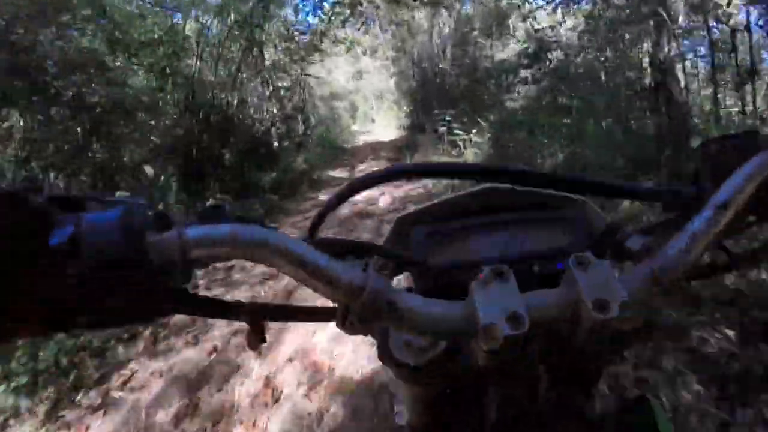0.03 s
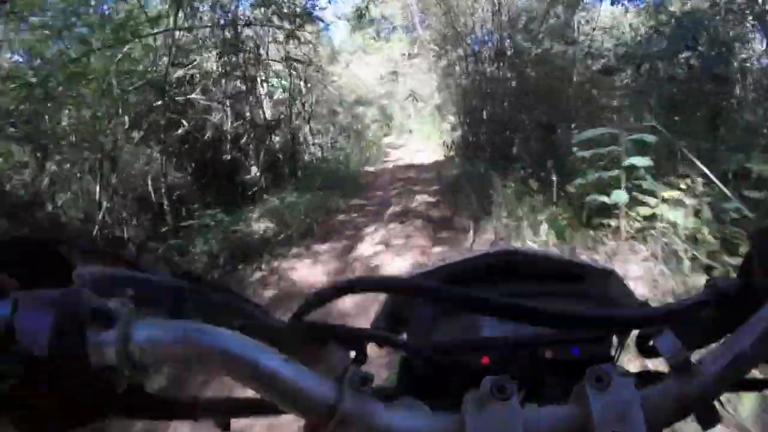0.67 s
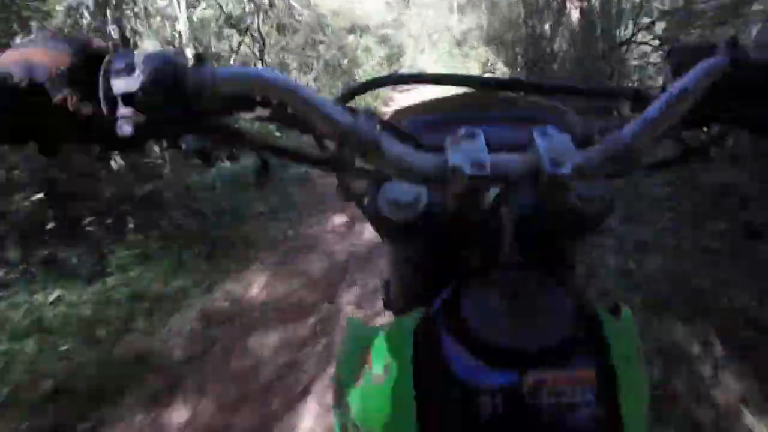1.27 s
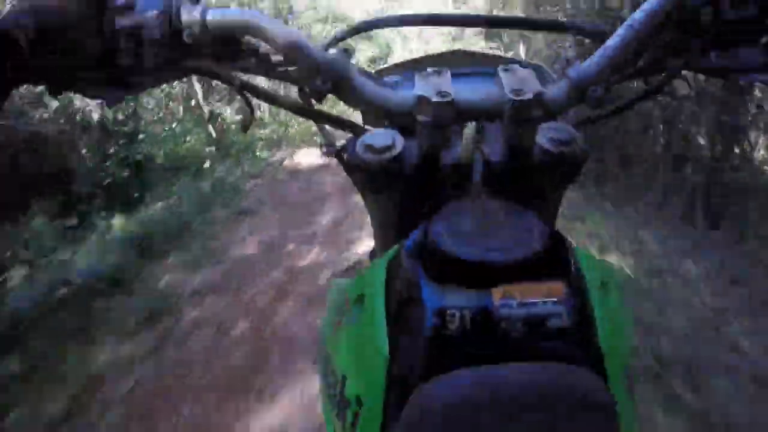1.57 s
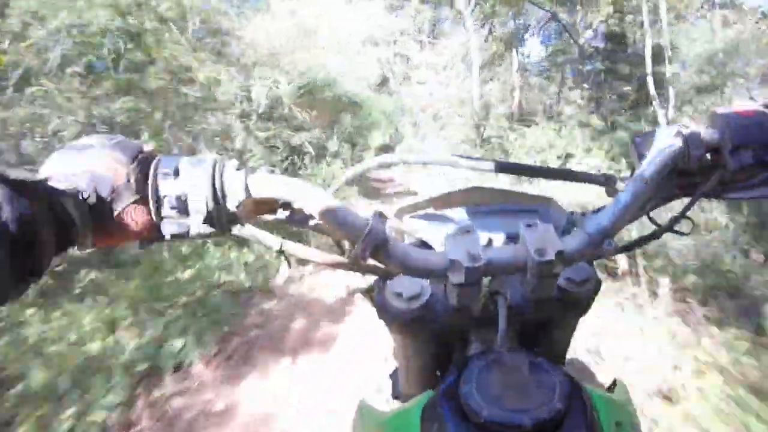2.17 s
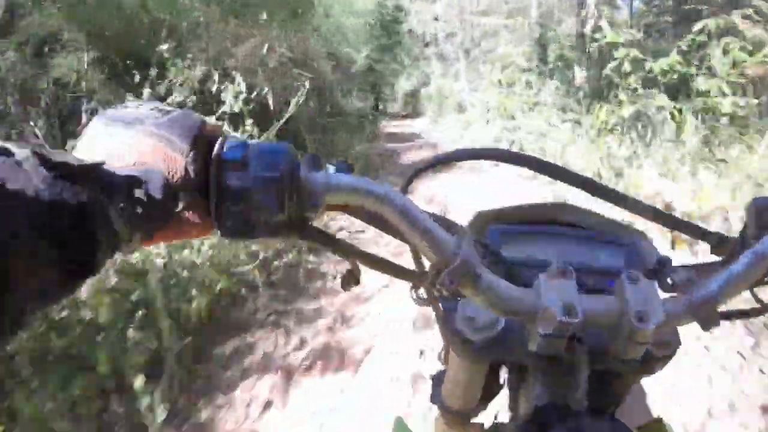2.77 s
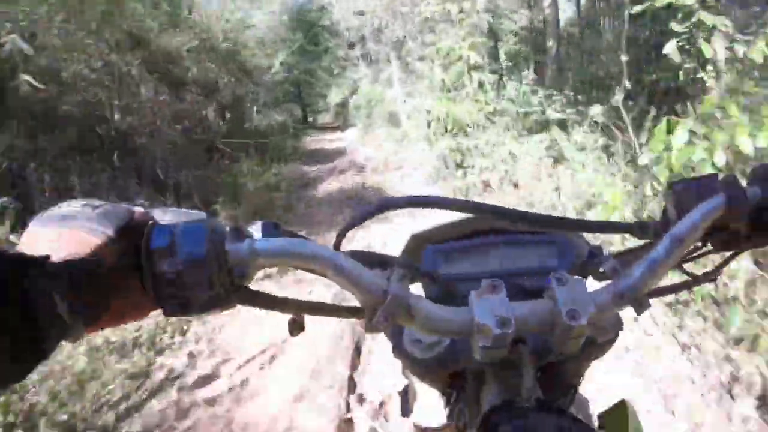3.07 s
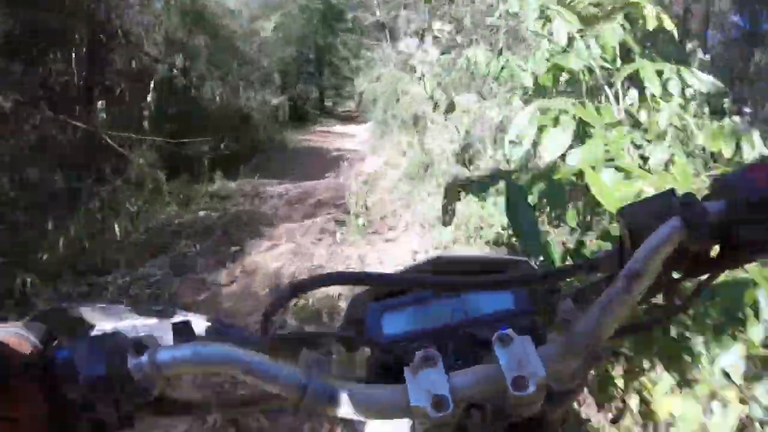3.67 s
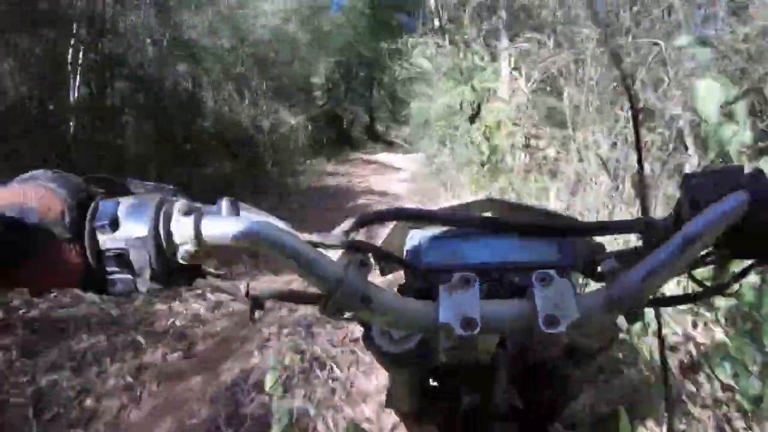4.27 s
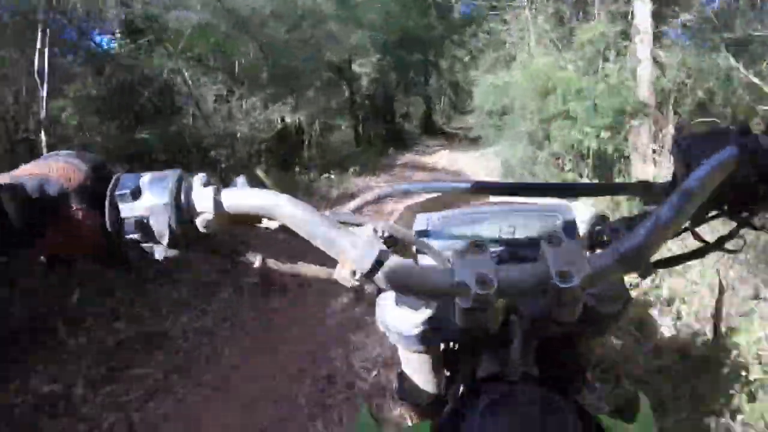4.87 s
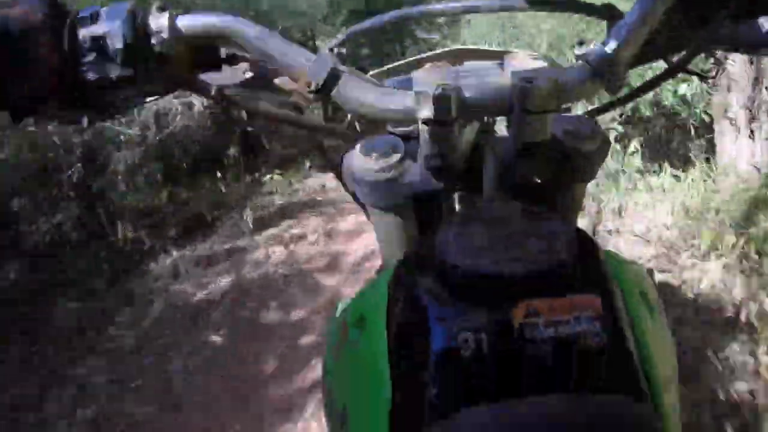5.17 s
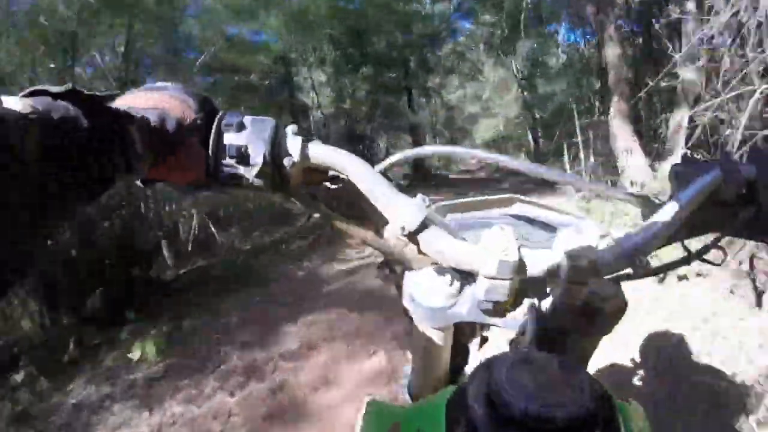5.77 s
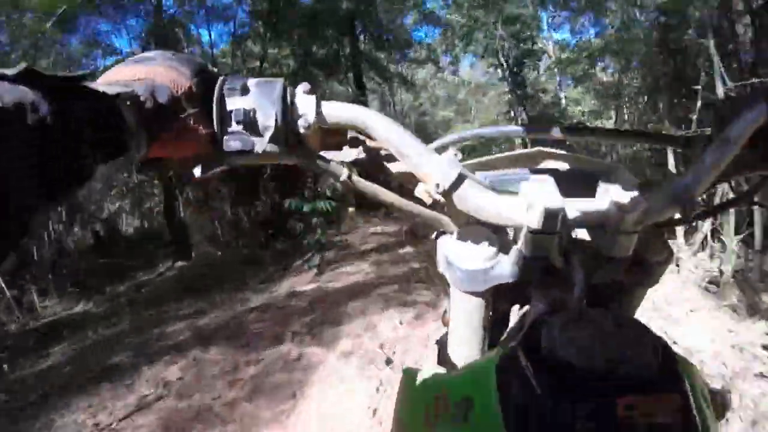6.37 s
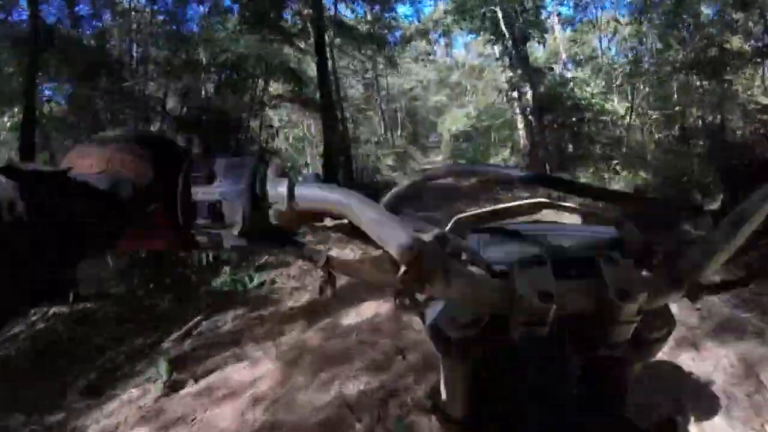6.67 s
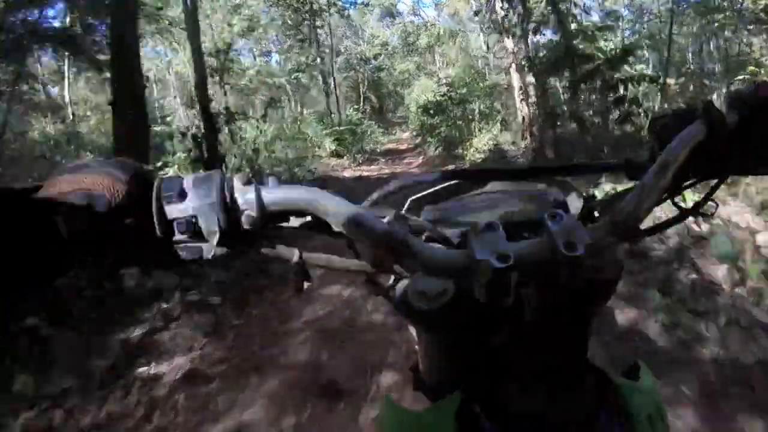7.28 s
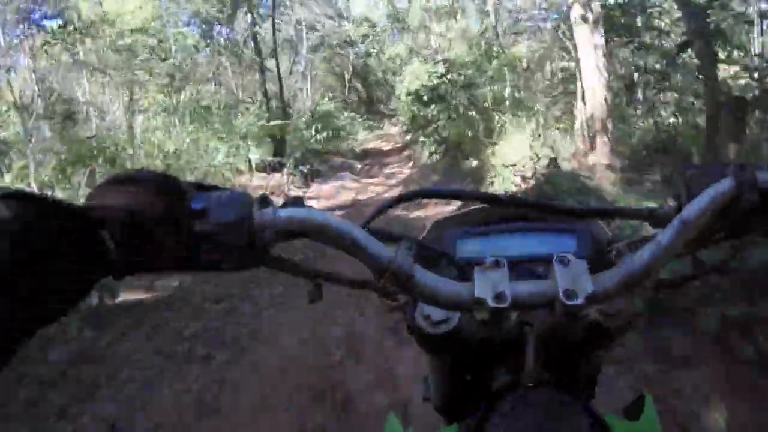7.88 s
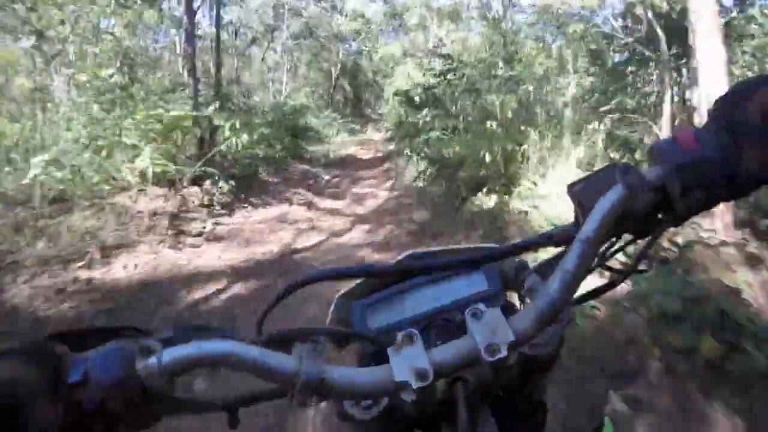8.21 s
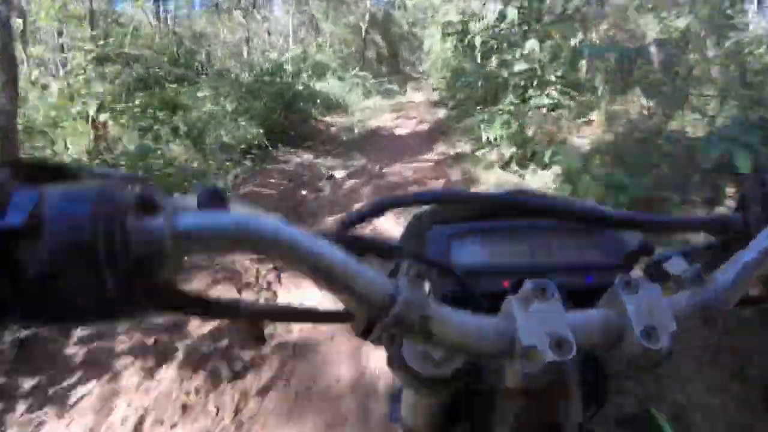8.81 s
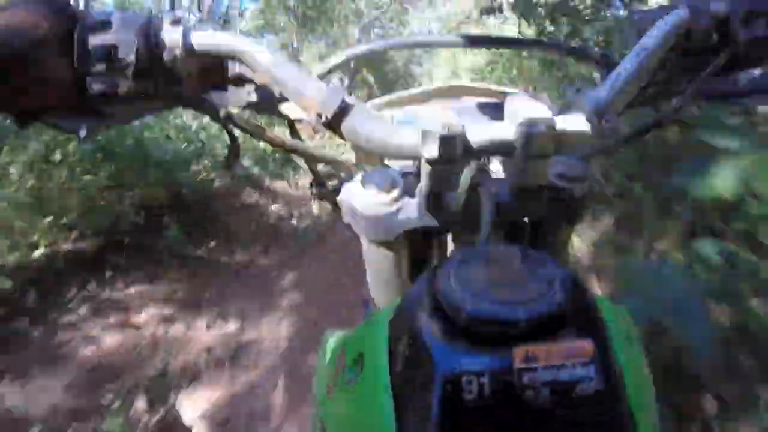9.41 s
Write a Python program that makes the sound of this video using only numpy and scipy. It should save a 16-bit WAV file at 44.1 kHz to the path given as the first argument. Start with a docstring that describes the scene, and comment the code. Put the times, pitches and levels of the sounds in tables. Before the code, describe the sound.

A single-cylinder four-stroke dirt bike is already under way on a forest trail, its exhaust thumping and its engine clattering over a low tyre rumble. The revs fall and the engine grows quieter. The bike hits a bump with a dull knock and a sharp clack, rattles briefly, then pulls away hard, taking another knock and easing off once more. The microphone is worn by the rider, just above the engine.

```python
"""First the close thump and clatter of a single-cylinder four-stroke dirt bike, already under way.
The place is a forest trail; the microphone is in a camera worn by the rider, just above the engine.
Each firing thumps in the exhaust, piston and valve gear clatter, and the tyres rumble on dirt below.
The throttle closes, the bike knocks and clacks over a bump near 4 s, ringing the camera's case,
then pulls away hard."""
import sys
import numpy as np
from scipy import signal
from scipy.fft import rfft, irfft
from scipy.io import wavfile

SR = 44100
rng = np.random.default_rng(int(sys.argv[2]) if len(sys.argv) > 2 else 0)


def log_audio(samples):
    """Write samples as a 16-bit WAV file to the path given in sys.argv[1]."""
    # one column per channel
    frames = np.atleast_2d(samples).T
    # limit to full scale, then quantise
    limited = np.clip(frames, -1, 1)
    pcm = np.round(limited * 32767).astype(np.int16)
    wavfile.write(sys.argv[1], SR, pcm)


N = 416744
TIME = np.arange(N) / SR


def undb(db):
    """Decibels to gain."""
    return 10 ** (np.asarray(db) / 20)


def unit(x):
    """Scale to rms 1."""
    return x / np.sqrt(np.mean(x ** 2))


def curve(rows):
    """Join (time, value) rows by straight lines."""
    return np.interp(TIME, *np.transpose(rows))


def walk(per_s):
    """Slow random drift with a spread near 1."""
    knots = rng.standard_normal(4096)
    return np.interp(TIME * per_s, np.arange(len(knots)), knots)


def colour(x, points, tilt_db=0, size=8192):
    """Ring x through a causal body with the given (Hz, dB) response, tilted by tilt_db an octave."""
    hz, db = np.transpose(points)
    octave = np.log2(np.maximum(np.fft.rfftfreq(size, 1 / SR), 1))
    outside = np.abs(octave - np.clip(octave, np.log2(hz[0]), np.log2(hz[-1])))
    gain = undb(np.interp(octave, np.log2(hz), db) + tilt_db * octave - 51.2 * outside)
    # minimum phase: the body rings only after it is struck
    cepstrum = irfft(np.log(gain + 1e-9))
    cepstrum[1:size // 2] *= 2
    cepstrum[size // 2 + 1:] = 0
    return signal.oaconvolve(x, irfft(np.exp(rfft(cepstrum))))[:len(x)]


def strikes(cycle, at, scatter_db, jitter_s):
    """One pulse a cycle, at the fraction `at` of it, scattered in size and timing."""
    chance = rng.standard_normal((1024, 2))[:int(cycle[-1])]
    when = (np.interp(np.arange(len(chance)) + at, cycle, TIME) + jitter_s * chance[:, 1]) * SR
    taps = when.astype(int)[:, None] + np.arange(-4, 5)
    pulses = np.sinc(taps - when[:, None]) * undb(scatter_db * chance[:, :1])
    out = np.zeros(N)
    np.add.at(out, np.clip(taps, 0, N - 1), pulses)
    return out


def clatter(cycle, throttle, body, at, swell_db, loose_db, size=8192, count=340):
    """Small contacts repeat at the same crank angles and ring a body; they loosen on the overrun."""
    phases = rng.uniform(0, 2 * np.pi, count)
    one_cycle = np.fft.ifft(np.r_[0, np.exp(1j * phases)], size).real
    pattern = unit(one_cycle[(cycle % 1 * size).astype(int)])
    loose = undb(loose_db - 7 * throttle) * rng.standard_normal(N)
    # the contacts are hardest just after the firing, and no two cycles are equal
    turn = 2 * np.pi * (cycle - at)
    force_db = swell_db * (np.cos(turn) - .5 * np.sin(2 * turn)) + .6 * walk(55)
    return unit(colour((pattern + loose) * undb(force_db), body))


# the exhaust pipe, heard from the saddle: (frequency [Hz], gain [dB])
PIPE_RESPONSE = [(50, -20), (110, -1.5), (165, -7.5), (215, 1), (270, 5.5), (335, 8.5), (385, 3), (440, -5),
                 (500, -9), (590, -1), (690, -21.5), (780, -23.5), (845, -5), (950, -6.5)]

def exhaust(cycle, throttle, effort_db):
    """Firings ring the pipe, louder on an open throttle; with it shut, more gas puffs between them."""
    firings = strikes(cycle, at=-0.109, scatter_db=.5, jitter_s=.00002)
    puffs = rng.standard_normal(N) * undb(17 * np.cos(2 * np.pi * cycle))
    thump = unit(colour(firings, PIPE_RESPONSE))
    gas = undb(-7 - 40 * throttle) * unit(colour(puffs, PIPE_RESPONSE))
    return undb(effort_db - 11.5 + 6.5 * throttle) * (thump + gas)


# piston noise as it reaches the microphone: (frequency [Hz], gain [dB])
PISTON_RESPONSE = [(500, -28.5), (760, -19), (845, -14.5), (950, -18), (1090, -8), (1200, -2.5),
                   (1360, -0.5), (1500, 8.5), (1580, 0.5), (1700, -6), (1800, -13), (2000, -26.5)]

def piston(cycle, firing_hz, throttle, effort_db):
    """The piston growls and slaps once a firing; the slap stands out when lugging at low revs."""
    lugging = throttle * np.clip((53 - firing_hz) / 11.3, 0, 1)
    slap_gain = 0.083 + 1.24 * lugging
    slap = unit(colour(strikes(cycle, at=0.0965, scatter_db=2.5, jitter_s=0), PISTON_RESPONSE))
    growl = clatter(cycle, throttle, PISTON_RESPONSE, at=.3, swell_db=2.4, loose_db=-4.5)
    level_db = effort_db + 0.34 + 1.55 * walk(14)
    return undb(level_db) * (slap_gain * slap + growl) / np.hypot(1, slap_gain)


# the engine cover's narrow resonance: (frequency [Hz], gain [dB])
COVER_RESPONSE = [(2300, -27.5), (2490, 2), (2610, 8), (2740, -12.5), (2870, -32.5)]
# how strongly the cover rings along the trail: (time [s], relative level [dB])
COVER_LEVEL = [(0, -6), (.9, -4), (1.85, -13), (2.9, -0.5), (3.6, -7), (5.3, -10), (6.5, -8), (6.85, 1),
               (7.05, -2), (7.15, -8.5), (7.95, -1.5), (8.3, 4), (9.1, -7), (9.45, -6.5)]

def engine_cover(cycle, throttle, effort_db):
    """Clatter rings the cover, down by the rider's boots, near 2.6 kHz."""
    level_db = effort_db + curve(COVER_LEVEL) - 1.06 + 1.5 * walk(10)
    return undb(level_db) * clatter(cycle, throttle, COVER_RESPONSE, at=0.18, swell_db=1.5, loose_db=7.5)


# the valve gear's bright ticking, at close range: (frequency [Hz], gain [dB])
VALVE_RESPONSE = [(1990, -7), (2180, 2.5), (2300, 10.5), (2430, -1), (2750, 5), (2900, -10.5), (3020, -3.5),
                  (3130, -11), (3360, 1), (3720, 1.5), (3900, -6), (4020, -8.5), (4200, -4), (4450, -21)]
# the chain's fine sizzle: (frequency [Hz], gain [dB])
CHAIN_RESPONSE = [(4300, -2.5), (4620, 0), (4950, -2), (5400, -4), (5650, -0.5), (5900, -4), (6450, 2),
                  (6780, -3), (7050, -1.5), (8300, -4.5), (9250, -10.5), (10200, -19.5), (12100, -26.5),
                  (15400, -33)]

def valves_and_chain(cycle, throttle, effort_db):
    """Valves tick and the chain sizzles, reaching the microphone directly and off tank and ground."""
    valves = clatter(cycle, throttle, VALVE_RESPONSE, at=.2, swell_db=3, loose_db=3)
    chain = clatter(cycle, throttle, CHAIN_RESPONSE, at=0.15, swell_db=2.5, loose_db=10.5)
    gear = undb(-4.5) * valves + undb(-14.5) * chain
    for echo_s in (.0037, .0083):  # close echoes carve fine ridges into the treble
        gear = gear + undb(-12) * np.interp(TIME - echo_s, TIME, gear, left=0)
    through_cover_db = 0.3 * curve(COVER_LEVEL)  # the gear sounds partly through the cover
    return undb(effort_db + through_cover_db - 2) * unit(gear)


# the frame's drone under the rider: (time [s], level relative to the effort [dB])
DRONE_LEVEL = [(0, -16), (1.4, -11.5), (1.75, -5), (2.7, -7.5), (3.7, -19.5), (5.2, -16.5), (6.5, -6.5),
               (7.3, -14.5), (8.3, -10), (8.8, -21), (9.4, -9)]

def frame_drone(cycle, effort_db):
    """The crank turns twice a cycle and the piston shakes the frame twice a turn."""
    crank_turns = 2 * cycle
    level_db = effort_db + curve(DRONE_LEVEL) + 1.5 * walk(8)
    return undb(level_db) * np.sqrt(2) * np.cos(2 * np.pi * 2 * crank_turns)


def frame_boom(cycle, firing_hz, throttle, effort_db, resonance_hz=123, half_width_hz=6):
    """The frame booms as a low firing harmonic passes its resonance, most plainly on the overrun."""
    boom = sum(np.cos(2 * np.pi * k * cycle) / np.hypot(1, (k * firing_hz - resonance_hz) / half_width_hz)
               for k in (2, 3))
    return undb(effort_db - 7 - 10.5 * throttle) * boom


# tyres on the forest trail, a bike's height below the microphone: (frequency [Hz], gain [dB])
DIRT_SPECTRUM = [(30, -36), (55, -14), (330, 1.5), (550, -8.5), (1100, -2)]

def tyres(effort_db):
    """Tyres rumble over uneven dirt, louder as the bike is driven harder."""
    level_db = -26 + .6 * effort_db + 2.77 * walk(15)
    return undb(level_db) * unit(colour(rng.standard_normal(N), DIRT_SPECTRUM))


def ring(modes, pitch, t):
    """Damped modes that swell as a soft blow pushes them; pitch multiplies their frequencies."""
    return sum(undb(db) * t / swell_s * np.exp(1 - t / swell_s) * np.sin(2 * np.pi * hz * pitch * t)
               for hz, db, swell_s in modes)


# blows from the trail: (time [s], level [dB], relative case level [dB], frame pitch [ratio])
BLOWS = [(2.118, -15.5, -12, 0.98), (3.929, -19.5, -21, 2.1), (3.96, -21, -27, 2.4),
         (3.989, -4, -10.5, 1.05), (4.163, -10.5, -9.5, 1.027), (6.331, -17, -20, 0.56),
         (6.699, -5, -11.5, 0.988)]
# modes of the bike's frame: (base frequency [Hz], level [dB], swell time [s])
FRAME_RING = [(152, -6.5, 0.0026), (240, -11.5, 0.0044), (395, -13.5, 0.0031), (538, -11.5, 0.0021)]
# modes of the case right around the microphone: (base frequency [Hz], level [dB], swell time [s])
CASE_RING = [(1527, 5.5, 0.0029), (1200, -33, 0.0052), (2480, -11, 0.00093)]

def suspension():
    """Dull suspension blows ring the frame and the camera's case."""
    out, t = np.zeros(N + SR), TIME[:4096]
    for start_s, db, case_db, pitch in BLOWS:
        blow = ring(FRAME_RING, pitch, t) + undb(case_db) * ring(CASE_RING, 0.92, t)
        out[int(start_s * SR):][:len(t)] += undb(db) * blow
    return out[:N]


# loose parts striking close by: (time [s], crunch peak [dB], tilt [dB/octave], buzz pitch [Hz])
LOOSE_HITS = [(4.016, -24, 2, 1700), (4.021, -22, -7, 3050), (4.054, -37, 7, 6650), (4.073, -22, 13, 4870),
              (4.081, -1.5, 3, 2600), (4.195, -13, -8.5, 3145), (4.214, -24, 3, 3052),
              (4.553, -55, 1, 9400), (4.792, -19.5, -11.5, 2194), (4.801, -20, 10, 2308),
              (4.810, -24.5, 17, 2278), (4.836, -27, -10, 1910)]
# the crunch of one contact, before its tilt: (frequency [Hz], gain [dB])
CRUNCH_SPECTRUM = [(300, -39), (1000, -23), (1600, -0.5), (2200, -2), (2750, 13.5), (3900, -5),
                   (5600, -2.5), (6300, -6), (8500, -22), (15000, -44)]

def loose_parts(swell_s=.0006, chatter_s=.008):
    """Each clack is a short crunch of contact and the buzz of the struck part at its own pitch."""
    out, t = np.zeros(N + SR), TIME[:4096]
    for start_s, db, tilt_db, buzz_hz in LOOSE_HITS:
        contact = rng.standard_normal(len(t)) * t / swell_s * np.exp(1 - t / swell_s)
        crunch = colour(contact, CRUNCH_SPECTRUM, tilt_db)
        chatter = rng.standard_normal(len(t)) * np.exp(-t / chatter_s)
        buzz = signal.lfilter(*signal.iirpeak(buzz_hz, Q=5, fs=SR), chatter)
        buzz_db = 0.28 * db - 22  # light touches have more chatter for their size than hard blows
        clack = undb(db) * crunch / np.abs(crunch).max() + undb(buzz_db) * buzz / np.abs(buzz).max()
        out[int(start_s * SR):][:len(t)] += clack
    return out[:N]


# engine speed along the trail: (time [s], firing rate [Hz])
FIRING_RATE = [(0.0, 55.42), (0.42, 55.52), (0.5, 57.04), (0.87, 58.46), (0.97, 55.94), (1.1, 59.32),
               (1.63, 58.87), (1.92, 62.64), (2.08, 60.7), (2.18, 55.4), (2.79, 45.66), (2.94, 45.0),
               (3.45, 38.89), (3.68, 34.82), (4.03, 34.77), (4.21, 44.22), (4.45, 45.6), (4.87, 37.05),
               (5.03, 43.28), (5.42, 52.9), (5.95, 49.92), (6.1, 53.29), (6.5, 56.4), (6.68, 52.32),
               (6.92, 54.9), (7.08, 53.58), (7.29, 55.96), (8.02, 54.47), (8.21, 47.98), (8.42, 45.7),
               (8.61, 52.04), (8.79, 50.23), (9.45, 54.33)]
# the rider's twist grip: (time [s], opening [0-1])
THROTTLE_OPENING = [(2.05, .45), (2.2, .25), (3.5, .15), (3.9, 0), (4.25, .7), (4.45, .6), (4.65, 0),
                    (5.0, .85), (6.7, .8), (8.0, .6), (8.4, .25), (8.48, .85)]
# engine effort, the base level of engine and tyres: (time [s], level [dB])
ENGINE_EFFORT = [(0.0, -28.5), (0.69, -28.5), (1.84, -22.5), (2.57, -33.5), (3.63, -38), (3.85, -38),
                 (4.36, -44), (4.78, -41), (4.85, -48), (5.15, -41), (5.32, -31), (5.62, -21.5),
                 (5.78, -24.5), (6.34, -17.5), (6.77, -23), (7.28, -20), (8.02, -26), (8.33, -34.5),
                 (8.74, -23), (9.26, -22), (9.45, -20)]

def scene():
    """Engine, tyres and bumps reach one microphone that travels with the rider."""
    firing_hz, throttle, effort_db = curve(FIRING_RATE), curve(THROTTLE_OPENING), curve(ENGINE_EFFORT)
    # engine cycles elapsed; the speed wavers as the rear wheel grips and slips
    cycle = np.cumsum(firing_hz * (1 + .005 * walk(11))) / SR
    mix = exhaust(cycle, throttle, effort_db)
    mix += piston(cycle, firing_hz, throttle, effort_db)
    mix += engine_cover(cycle, throttle, effort_db)
    mix += valves_and_chain(cycle, throttle, effort_db)
    mix += frame_drone(cycle, effort_db)
    mix += frame_boom(cycle, firing_hz, throttle, effort_db)
    mix += tyres(effort_db)
    bass_cut = signal.butter(4, 85, "high", fs=SR, output="sos")  # the blows and clacks are cut below about 85 Hz
    mix += signal.sosfilt(bass_cut, suspension() + loose_parts())
    return np.tile(mix, (2, 1))


def record(dry, top_hz=15400):
    """The rider's camera cuts the top treble steeply."""
    return signal.sosfilt(signal.ellip(8, .2, 70, top_hz, fs=SR, output="sos"), dry)


dry = scene()
out = record(dry)
log_audio(out)
```